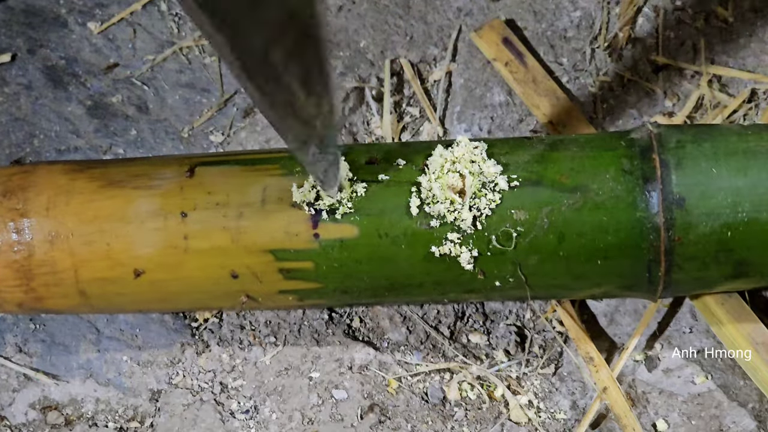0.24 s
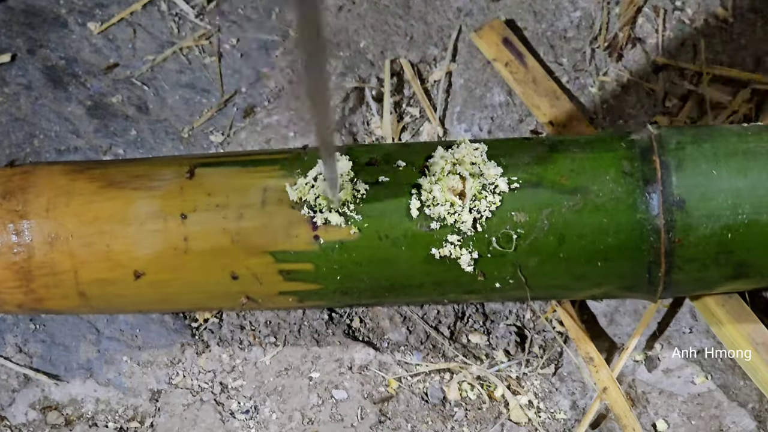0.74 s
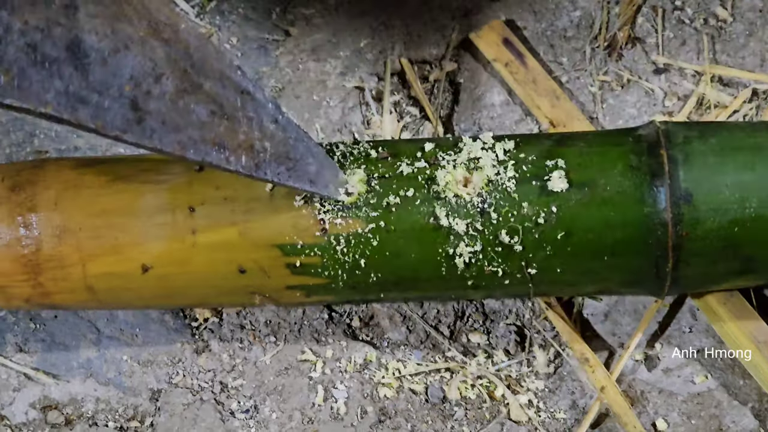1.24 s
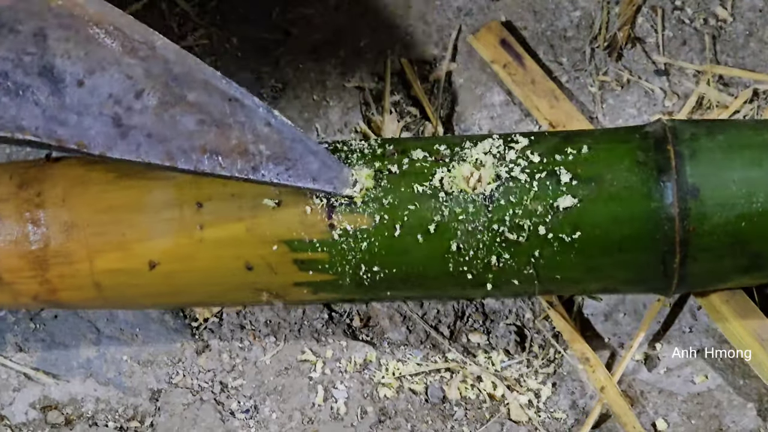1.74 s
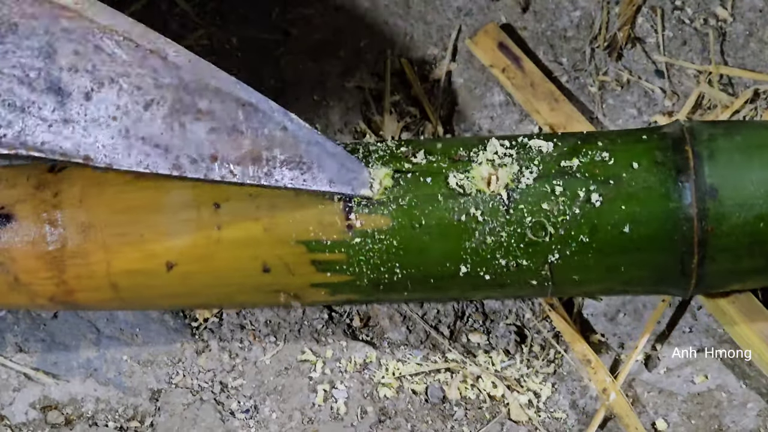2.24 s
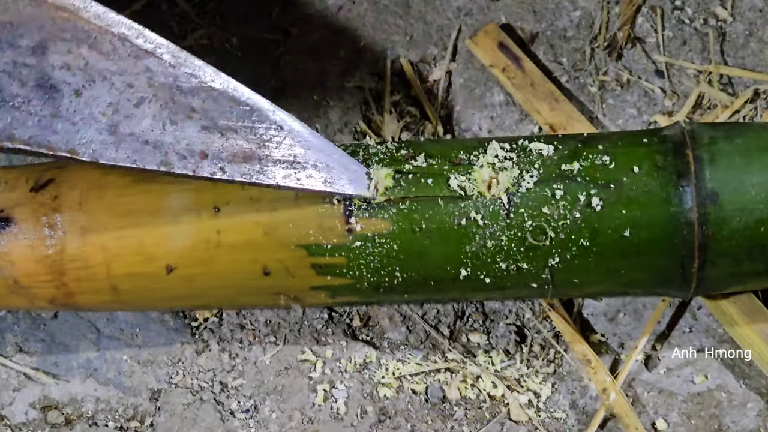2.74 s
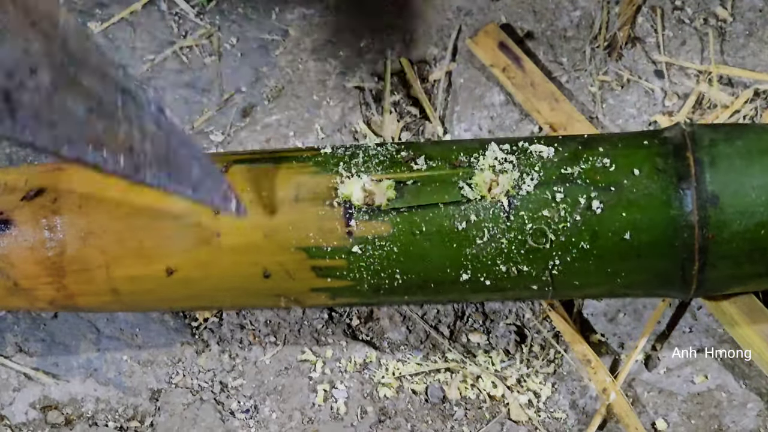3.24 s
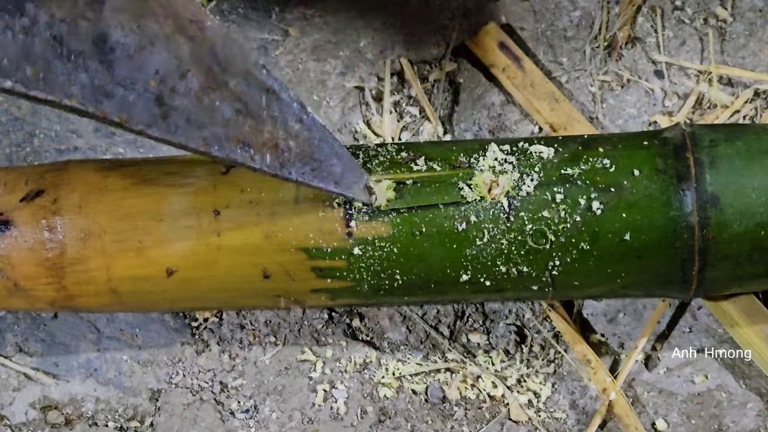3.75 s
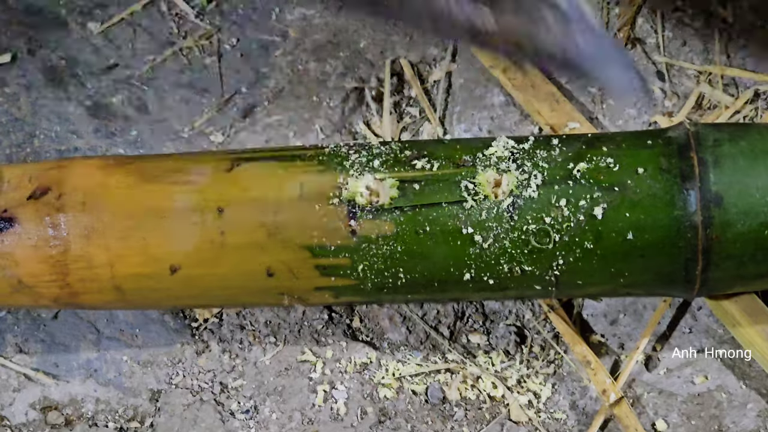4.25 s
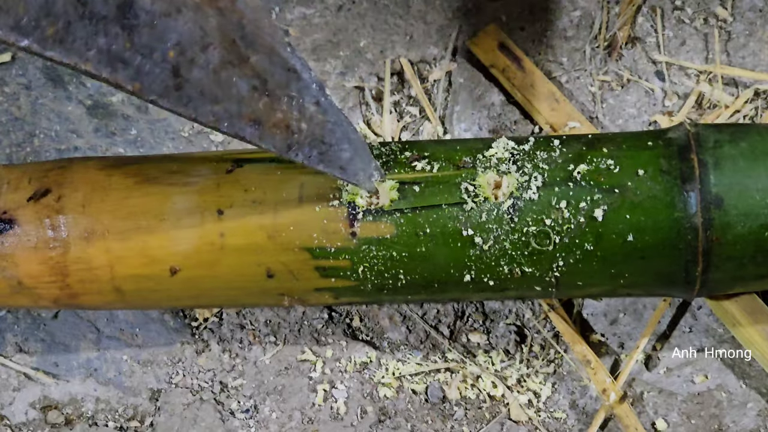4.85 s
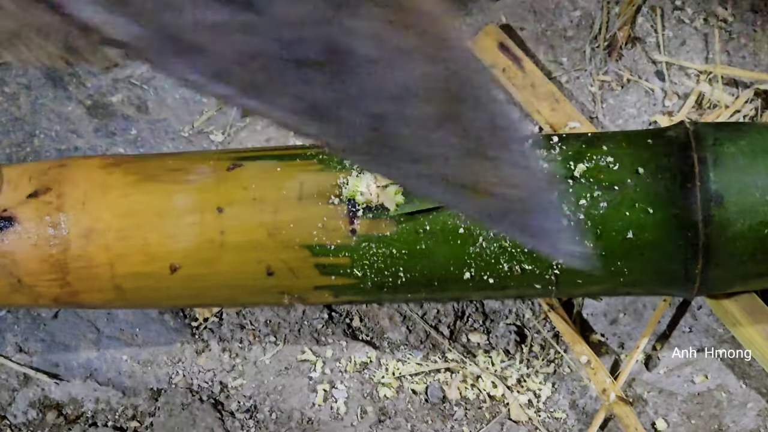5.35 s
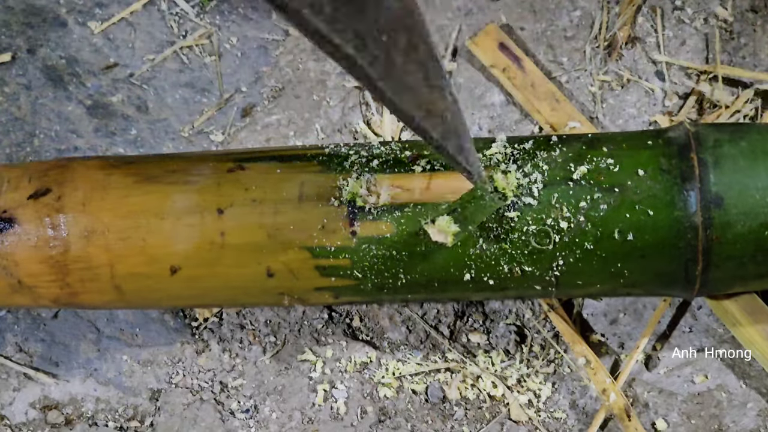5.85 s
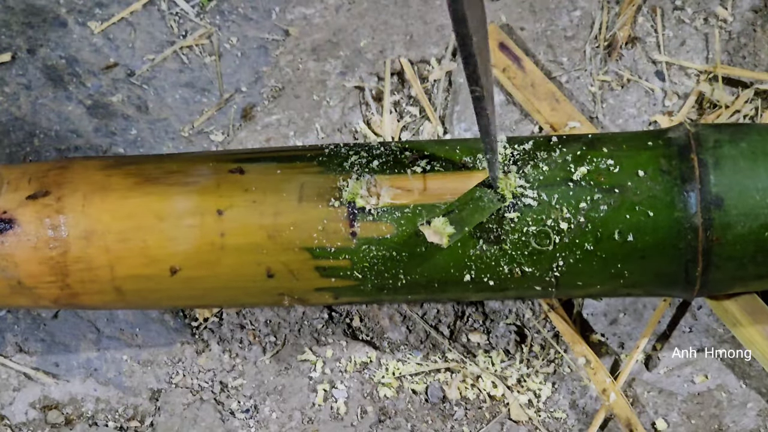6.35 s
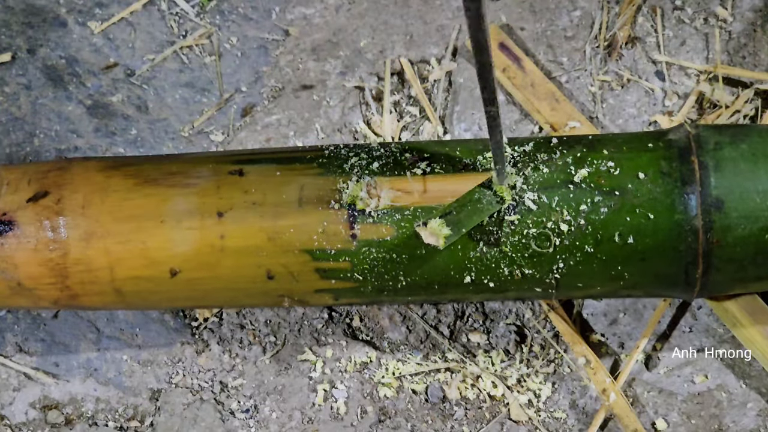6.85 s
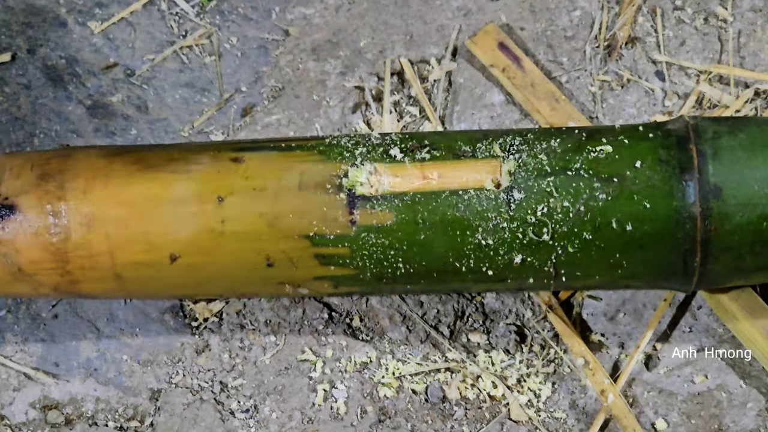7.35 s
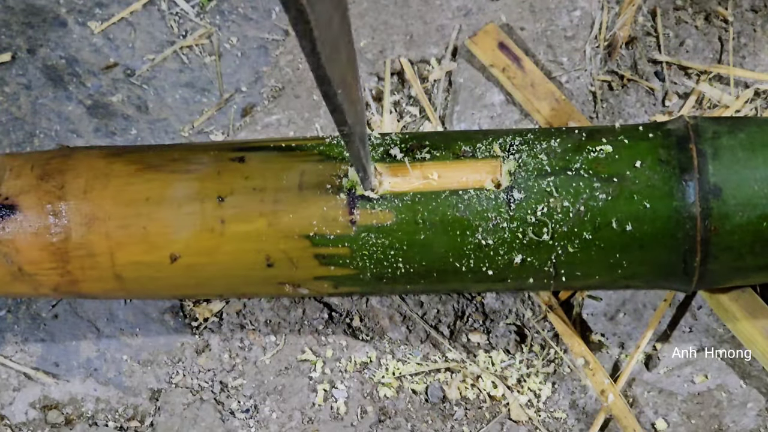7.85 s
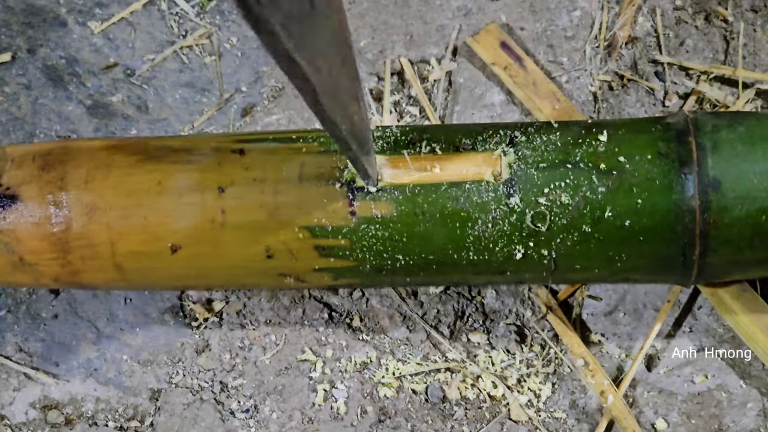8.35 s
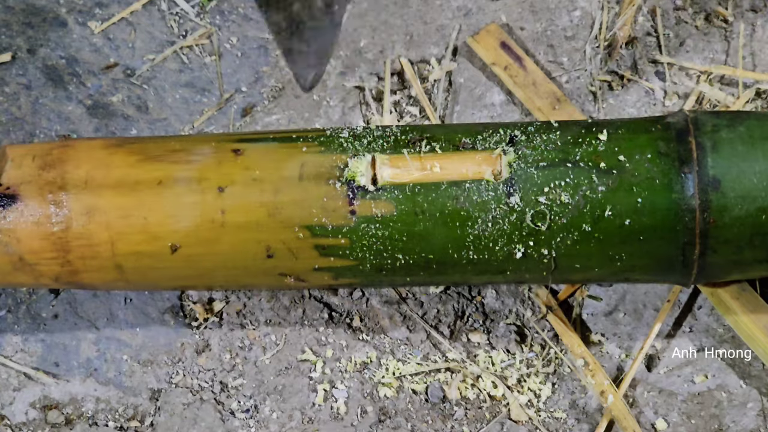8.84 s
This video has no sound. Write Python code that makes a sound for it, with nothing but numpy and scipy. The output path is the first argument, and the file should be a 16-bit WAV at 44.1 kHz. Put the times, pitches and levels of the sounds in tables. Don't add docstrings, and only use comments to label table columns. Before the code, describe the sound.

A blade tip crunches back and forth in bamboo, about three bites a second, until the scene drops out briefly. Then come sparse, very short, woody cracks with papery fibre ticks, a heavy thud near the middle, and bright double chops near the end. The microphone is close and dry, outdoors; a soft hiss like rain, blurred insects and distant rumble sink after blows and slowly return.

```python
import sys
import numpy as np
from scipy import signal
from scipy.fft import rfft, irfft, next_fast_len
from scipy.io import wavfile
from scipy.ndimage import uniform_filter1d

SR = 44100
rng = np.random.default_rng(int(sys.argv[2]) if len(sys.argv) > 2 else 0)


def generate_wav(sig):
    pcm = np.round(np.clip(np.atleast_2d(sig).T, -1, 1) * 32767).astype(np.int16)
    wavfile.write(sys.argv[1], SR, pcm)


def volts_from_db(level):
    exponent = np.asarray(level, float) / 20
    return 10 ** exponent


N = 401751

# t/s, tube level/dB, blade level/dB, splinter level/dB,
# tone of the struck spot f/Hz
CHOPS = [
    (7.0884, -25, -13, -28, 1380),
    (7.0925, -16, -8.5, -18, 2099),
    (7.0974, -15.5, -13, -23.5, 1354),
    (7.212, -13.5, -5.5, -16, 1410),
    (7.213, -15, -14.5, -36, 2256),
    (8.0181, -17.5, -11, -20, 1680),
    (8.0195, -11, -16, -23, 3300),
    (8.1432, -25, -9.5, -20.5, 1330),
    (8.147, -24, -40, -40, 1980),
    (8.148, -34.5, -45, -45, 940),
]
BLOWS = [
    (1.3723, -14.5, -9, -10, 1376),
    (1.9345, -20, -16, -14, 1850),
    (1.9365, -16.5, -17, -22, 2300),
    (2.0737, -20, -13.5, -13.5, 1560),
    (5.2864, -18.5, -15.5, -17, 1530),
    (5.2875, -20, -25, -22, 2680),
    (1.3735, -16, -18, -25, 1840),
    (2.0745, -17.5, -33, -38, 1850),
]
KNOCKS = [
    (3.0994, -25, -21, -9, 3725),
    (3.92, -12, -21, -21, 2110),
    (3.9236, -13, -23, -20, 1335),
    (4.2301, -25, -26.5, -17, 2710),
    (5.1347, -12, -15.5, -23, 1324),
    (5.1352, -19.5, -45, -42, 995),
    (6.5715, -29.5, -27, -29, 2880),
    (6.5762, -16, -31.5, -33, 1620),
    (6.5768, -21, -31, -39, 980),
]
TWISTS = [
    (0.0367, -36, -26, -19, 2060),
    (0.057, -52, -23.5, -22.5, 2630),
    (0.3406, -28.5, -29, -24, 1860),
    (0.3566, -45, -25, -21, 2720),
    (0.6624, -25, -29, -19, 2010),
    (0.681, -36, -24.5, -18, 1990),
    (0.9732, -26.5, -22, -16.5, 2030),
    (0.9956, -30, -22, -17.5, 1690),
]
RETURNS = [
    (0.1764, -42, -28, -25.5, 1870),
    (0.492, -44, -30.5, -25, 2000),
    (0.534, -38, -35, -27.5, 1840),
    (0.804, -42, -28, -26, 2040),
    (0.843, -36, -31, -26, 1000),
]
# t/s, tube level/dB, blade level/dB, splinter level/dB
TICKS = [(1.174, -7, -17, -22.5), (1.2196, -33, -39, -22), (1.862, -55, -49, -32),
         (2.2538, -55, -30.5, -19), (2.2643, -53, -51, -19), (2.2895, -47, -36, -15.5),
         (2.2945, -45, -26.5, -19), (2.3114, -51, -42, -31), (2.5015, -53.5, -49, -31),
         (2.562, -50, -50, -36), (2.9994, -47, -40, -34), (3.4797, -29, -43, -33.5),
         (3.5054, -29, -39, -34), (3.7904, -47, -50.5, -49), (3.8694, -45, -50, -41),
         (3.9614, -49, -55, -41), (4.2306, -43, -51, -15.5), (4.4895, -51, -46, -33.5),
         (4.68, -45, -40, -31.5), (5.2405, -41, -40, -38), (5.5633, -24, -33, -27), (5.63, -23, -36, -23.5),
         (5.894, -24, -36, -18), (5.9627, -26, -39, -28.5), (6.4884, -48, -36, -42),
         (7.1591, -48, -55, -44), (7.6874, -31, -43, -40), (7.8744, -39, -36, -48), (8.7974, -50, -54, -38)]
# t/s, thud level/dB, hollow level/dB
THUDS = [
    (1.366, -22, -37),
    (1.933, -19.5, -23.5),
    (2.072, -23.5, -23),
    (3.916, -10.5, -29),
    (5.285, -31.5, -49),
    (7.091, -27, -27),
    (7.208, -15.5, -28),
    (8.019, -22, -28),
]

# f/Hz, level/dB, time to -60 dB/s
TUBE_MODES = [(850, -30, 0.054), (1000, -16, .07), (1360, -23, 0.063), (1390, 7, 0.07), (1482, 15, 0.055),
              (1656, 11, 0.053)]
# f/Hz, level/dB, time to -60 dB/s
WALL_MODES = [(1810, -5, 0.14), (1977, 3, 0.15), (2060, 10.5, 0.027), (2300, 6.5, 0.011), (2632, 13, 0.035)]
# f/Hz, level/dB, time to -60 dB/s
BLADE_MODES = [(2940, -6, 0.02), (3114, 4, 0.026), (3353, 11, 0.041), (3410, 0, 0.099), (3547, -2, 0.066),
               (3700, -30, 0.066)]
# f/Hz, level/dB, time to -60 dB/s
SPLINTER_MODES = [(6900, -11, 0.015), (7360, -1.5, 0.024), (7670, 2, 0.0078), (8410, 0, 0.0061),
                  (9340, -1, 0.006), (10060, -7, 0.0085)]

# f/Hz, level/dB
BACKGROUND_COLOUR = [(30, -38), (75, -8.5), (145, -4), (210, 0.5), (404, -6.5), (600, -12.5), (801, -16.5),
                     (1070, -14), (2010, -21), (5300, -20.5), (6300, -28), (7300, -24), (11000, -26),
                     (16000, -36)]
# f/Hz, likeness/1
EAR_LIKENESS = [(60, 0.96), (130, 0.95), (290, 0.99), (640, 0.83), (1410, 0.43), (3100, -0.021),
                (6820, -0.058), (15000, -0.073)]
# f/Hz, width/Hz, level against the haze/dB
INSECTS = [
    (5270, 310, -15.5),
    (7090, 650, -16.5),
]
# t/s, level/dB
TRAFFIC_SWELL = [(0, -0.5), (1.17, -0.5), (1.5, -0.5), (2.1, 1.5), (3.0, -1), (4.3, -0.5), (5.2, 0.5),
                 (5.6, 0), (6.8, -0.5), (8.0, 0.5), (9.11, -0.5)]
# t/s, depth/dB
GAIN_DIPS = [(1.385, -14), (1.94, -13.5), (2.08, -13), (2.3, -10), (3.105, -12), (3.925, -13), (4.235, -5),
             (5.29, -14), (7.1, -14.5), (7.22, -15), (8.025, -13.5), (8.15, -16.5)]
# t/s, level/dB
SCENE_CHANGE = [
    (.9, 0.5),
    (1.03, -2),
    (1.12, -10),
    (1.134, -22),
    (1.136, -60),
    (1.166, -60),
    (1.172, -13),
    (1.215, -7),
    (1.3, 1),
]

EVENT_S, LEAD_IN_S = 0.13, 0.02
SPOT_CYCLES, TUBE_UNDER_SPOT_DB = 66, -9.5
HOLLOW_HZ, HOLLOW_T60_S, THUD_HZ, THUD_T60_S = 555, 0.23, 283, 0.02
RUMBLE_DB, HAZE_DB, AIR_DB = -30, -34, -44.5
GAIN_ATTACK_S, GAIN_RELEASE_S = 0.02, 1.62
SLOW_STEP = 40
CUTOFF_HZ, EDGE_HZ, BLOCK = 16450, (15250, 15650), 1024


def band(x, low_hz, high_hz):
    return signal.sosfilt(signal.butter(2, [low_hz, high_hz], "band", fs=SR, output="sos"), x)


def high_pass(x, order, hz):
    return signal.sosfilt(signal.butter(order, hz, "high", fs=SR, output="sos"), x)


def ring(force, hz, t60):
    r, w = volts_from_db(-60 / (t60 * SR)), 2 * np.pi * hz / SR
    return signal.lfilter([0, np.sin(w)], [1, -2 * r * np.cos(w), r * r], force + 1e-18)


def peak_one(x):
    return x / np.sqrt(2 * uniform_filter1d(x ** 2, size=132).max(axis=-1, keepdims=True))


def rms_one(x):
    return x / np.sqrt(np.mean(x ** 2) + 1e-20)


def at_hz(points, hz):
    table_hz, value = np.array(points).T
    return np.interp(np.log(hz), np.log(table_hz), value)


def in_time(rows):
    s, level = np.transpose(rows)
    return np.interp(np.arange(N) / SR, s, level)


def slow_to_samples(slow):
    return np.interp(np.arange(N) / SLOW_STEP, np.arange(len(slow)), slow)


def drift(rate):
    r = np.exp(-2 * np.pi * rate * SLOW_STEP / SR)
    slow = signal.lfilter([1], [1, -2 * r, r * r], rng.standard_normal(N // SLOW_STEP + 2002))
    return slow_to_samples(rms_one(slow[2000:]))


def tearing_force(count, t, length_s, lead_s, lead_db, grain_db, alike):
    bite = volts_from_db(lead_db) * np.exp(np.minimum(t, 0) / max(lead_s, 1e-4))
    fall = np.exp(-(abs(t) / length_s) ** 1.04) + 0.74 * np.exp(-abs(t) / 0.0024)
    envelope = np.where(t < 0, bite, fall)
    grain = np.minimum(rng.exponential(1, (count, 1, len(t))), 4)
    grit = rng.standard_normal((count, 3, len(t))) * volts_from_db(grain_db * grain)
    alike = np.clip(alike, 0, 1)
    shared, separate = grit[:, :1], grit[:, 1:]
    return high_pass(envelope * (np.sqrt(alike) * shared + np.sqrt(1 - alike) * separate), 4, 820)


def body_ring(force, modes, sustain, other_ear=0):
    hz, db, t60 = np.transpose(modes)
    strength = volts_from_db(db + 2.5 * rng.standard_normal((len(force), 2, len(modes))))
    rung = 0
    for k in range(len(modes)):
        rung = rung + strength[..., k:k + 1] * peak_one(ring(force, hz[k], t60[k] * sustain))
    if other_ear:
        rung = peak_one(rung + other_ear * rung[:, ::-1])
    return peak_one(rung)


def struck_spot(force, spots_hz, sustain):
    tones = []
    for f, hz in zip(force, spots_hz):
        tones.append(ring(f + 0.34 * f[::-1], hz, SPOT_CYCLES * sustain / hz))
    return peak_one(np.array(tones))


def contacts(events, length_s, lead_s, lead_db, grain_db, alike, gain_db, sustain, wall_db, crack_db, fizz_db):
    rows, out = np.array(events), np.zeros((2, N + SR))
    tube_db, blade_db, splinter_db = rows.T[1:4, :, None, None] + gain_db
    t = np.arange(round(EVENT_S * SR)) / SR - LEAD_IN_S
    force = tearing_force(len(rows), t, length_s, lead_s, lead_db, grain_db, alike)
    sound = peak_one(band(force, 4490, 6230)) * volts_from_db((blade_db + splinter_db) / 2 + crack_db)
    sound += peak_one(band(force, 9830, 20400)) * volts_from_db(splinter_db + fizz_db)
    sound += body_ring(force, SPLINTER_MODES, sustain) * volts_from_db(splinter_db)
    sound += body_ring(force, TUBE_MODES, sustain, other_ear=0.11) * volts_from_db(tube_db + TUBE_UNDER_SPOT_DB)
    sound += body_ring(force, WALL_MODES, sustain) * volts_from_db(blade_db + wall_db)
    sound += body_ring(force, BLADE_MODES, sustain) * volts_from_db(blade_db)
    for spots_hz in rows.T[4:]:
        sound += struck_spot(force, spots_hz, sustain) * volts_from_db(tube_db)
    for s, piece in zip(rows[:, 0], sound):
        at = round((s + t[0]) * SR)
        out[:, at:at + len(t)] += piece
    return out[:, :N]


def chops():
    return contacts(CHOPS, length_s=0.0059, lead_s=0.0041, lead_db=-14, grain_db=3.5, alike=0.047, gain_db=0.5,
                    sustain=0.78, wall_db=-12.5, crack_db=-2.5, fizz_db=-1.5)


def blows():
    return contacts(BLOWS, length_s=0.0056, lead_s=0.0035, lead_db=-6.5, grain_db=3.0, alike=0.041, gain_db=-0.5,
                    sustain=0.65, wall_db=-2.5, crack_db=0.0, fizz_db=-0.5)


def knocks():
    return contacts(KNOCKS, length_s=0.0029, lead_s=0.0036, lead_db=-11, grain_db=2.0, alike=0.033, gain_db=-0.5,
                    sustain=0.48, wall_db=-3.0, crack_db=0.5, fizz_db=-4)


def twists():
    return contacts(TWISTS, length_s=0.0098, lead_s=0.0083, lead_db=-3.5, grain_db=3, alike=0.11, gain_db=0.5,
                    sustain=0.78, wall_db=-15, crack_db=-5, fizz_db=1.5)


def returns():
    return contacts(RETURNS, length_s=0.025, lead_s=0.0034, lead_db=-7, grain_db=2.5, alike=0.16, gain_db=1.0,
                    sustain=0.53, wall_db=-8.5, crack_db=-8, fizz_db=0.5)


def ticks():
    return contacts(TICKS, length_s=0.0046, lead_s=0.0021, lead_db=-8, grain_db=5.5, alike=0.093, gain_db=-1.0,
                    sustain=0.54, wall_db=-6, crack_db=-8, fizz_db=1)


def thuds():
    s, thud_db, hollow_db = np.transpose(THUDS)
    push, hum = np.zeros(N), np.zeros(N)
    at = np.round((s + 0.00335) * SR).astype(int)
    push[at], hum[at] = volts_from_db(thud_db), volts_from_db(hollow_db - 8.5)
    low = ring(push, THUD_HZ, THUD_T60_S)
    low += volts_from_db(-3.5) * ring(push, 476, 0.027)
    low += ring(hum, HOLLOW_HZ, HOLLOW_T60_S)
    return band(low, 120, 1060)


def haze(low_hz, high_hz, count, patchy_db):
    out, edges = 0, np.geomspace(low_hz, high_hz, count + 1)
    white = rng.standard_normal((2, 2, N))
    for k, (low, high) in enumerate(zip(edges, edges[1:])):
        mid, side = band(white[k % 2], low, high)
        hz = np.sqrt(low * high)
        alike = np.clip(at_hz(EAR_LIKENESS, hz), -1, 1)
        gain = volts_from_db(at_hz(BACKGROUND_COLOUR, hz) + patchy_db * drift(13.8))
        out = out + gain * (np.sqrt(1 + alike) * mid + np.sqrt(1 - alike) * side * [[1], [-1]])
    return rms_one(out)


def insects():
    out = 0
    for hz, width, db in INSECTS:
        chirps = rms_one(band(rng.standard_normal((2, N)), hz - width / 2, hz + width / 2))
        out = out + volts_from_db(db + 2.5 * drift(6.6)) * chirps
    return out


def gain_control():
    s, depth_db = np.transpose(GAIN_DIPS)[..., None]
    since = np.arange(0, N, SLOW_STEP) / SR - s
    held = np.where(since > 0, depth_db * np.exp(-abs(since) / GAIN_RELEASE_S), 0).min(axis=0)
    r = np.exp(-SLOW_STEP / (SR * GAIN_ATTACK_S))
    return slow_to_samples(signal.lfilter([1 - r], [1, -r], held))


def background():
    rumble = volts_from_db(RUMBLE_DB + in_time(TRAFFIC_SWELL)) * haze(39.2, 752, count=10, patchy_db=2.5)
    rain = volts_from_db(HAZE_DB) * (haze(867, 10680, count=10, patchy_db=2.2) + insects())
    air = volts_from_db(AIR_DB) * haze(10500, 16900, count=3, patchy_db=2.5)
    return (rumble + rain + air) * volts_from_db(gain_control())


def scene():
    return chops() + blows() + knocks() + twists() + returns() + ticks() + thuds() + background()


def flutter(x):
    size = next_fast_len(N)
    spectrum, hz = rfft(x, size), np.arange(size // 2 + 1) * SR / size
    quiet = uniform_filter1d(abs(x).max(axis=0), size=BLOCK) < 0.1
    sometimes = np.repeat(drift(12)[::BLOCK] < 0.1, BLOCK)[:N]
    for low, high, dropped in [(*EDGE_HZ, quiet & sometimes), (EDGE_HZ[1], SR, quiet)]:
        top = irfft(spectrum * ((hz > low) & (hz <= high)), size)[:, :N]
        x = x - top * uniform_filter1d(dropped * 1., size=256)
    return x


def low_pass(x):
    return signal.sosfilt(signal.butter(12, 16520, fs=SR, output="sos"), x)


def record(dry):
    limited = np.clip(dry, -0.86, 0.86)
    cut = signal.sosfilt(signal.cheby2(16, 60, CUTOFF_HZ, fs=SR, output="sos"), limited)
    cut = high_pass(cut, 2, 40)
    mix = flutter(cut) * volts_from_db(in_time(SCENE_CHANGE))
    return low_pass(mix)


dry = scene()
out = record(dry)
generate_wav(out)
```